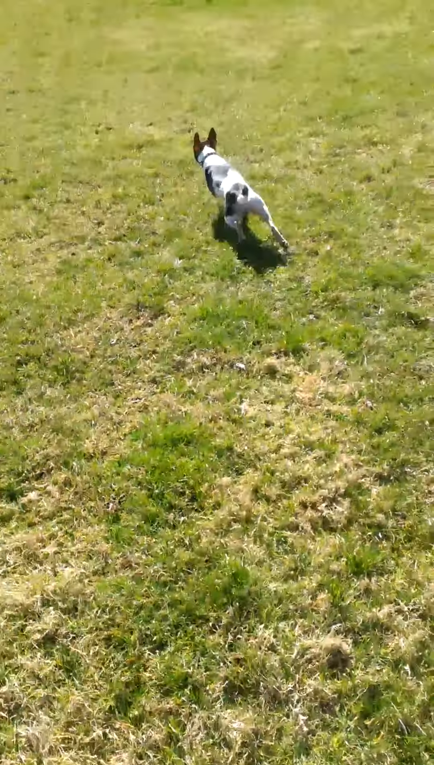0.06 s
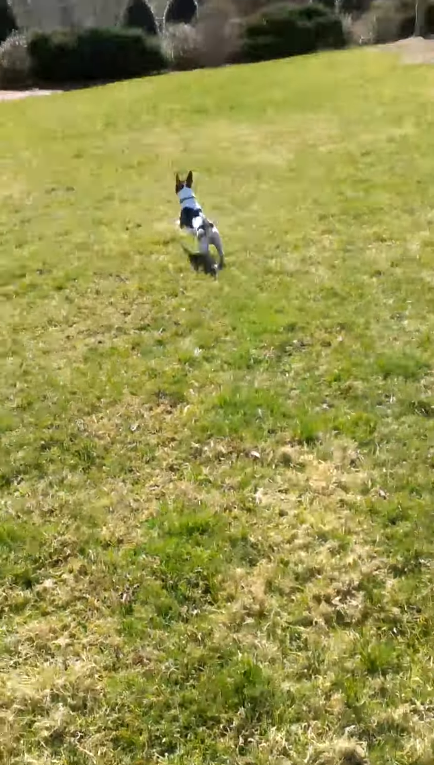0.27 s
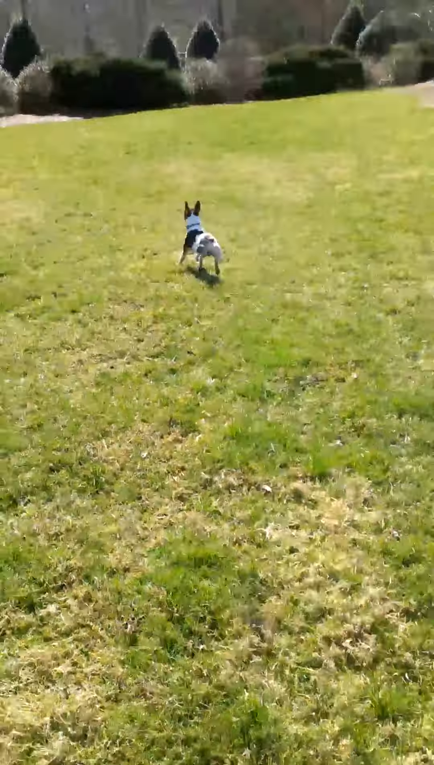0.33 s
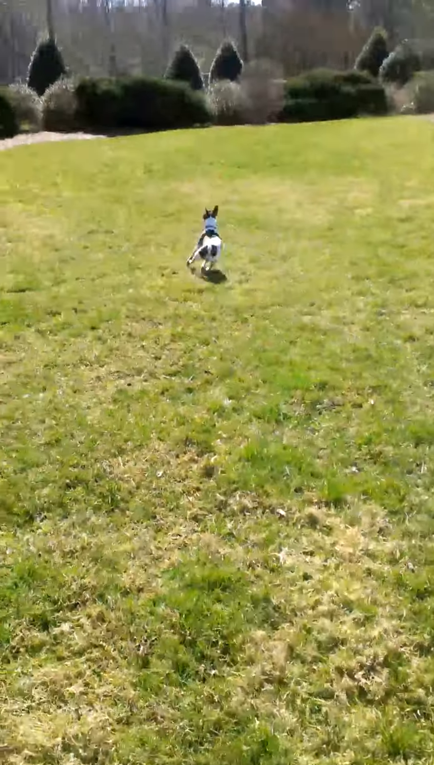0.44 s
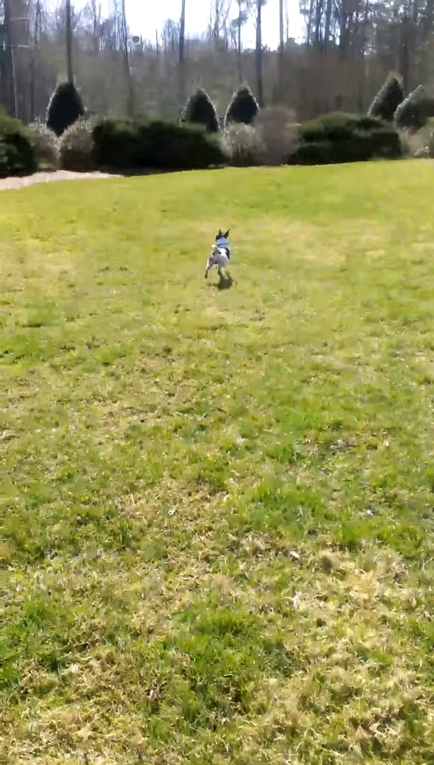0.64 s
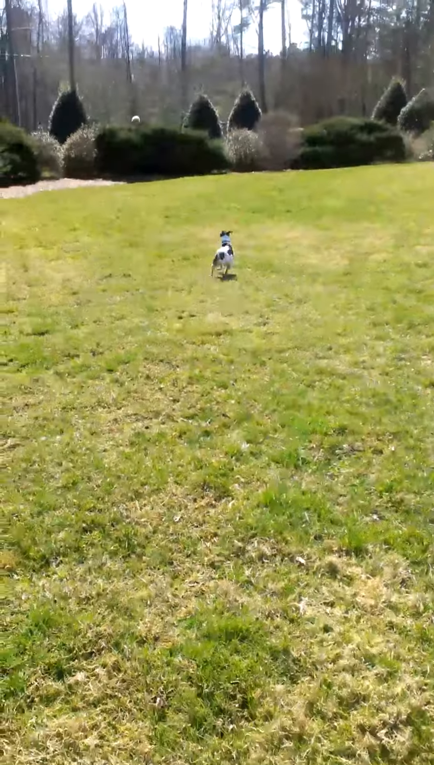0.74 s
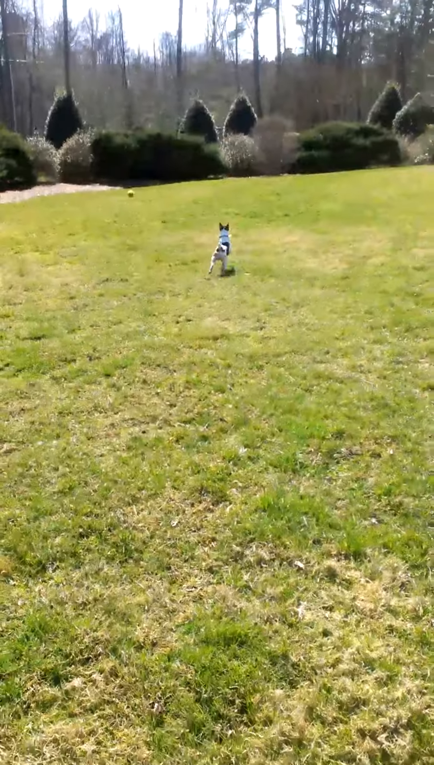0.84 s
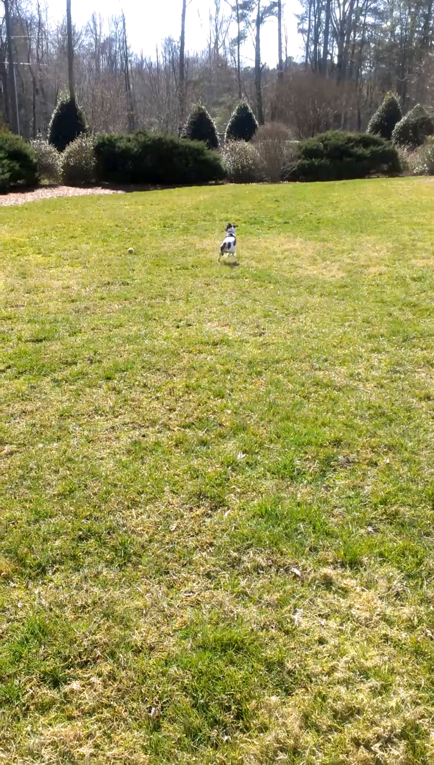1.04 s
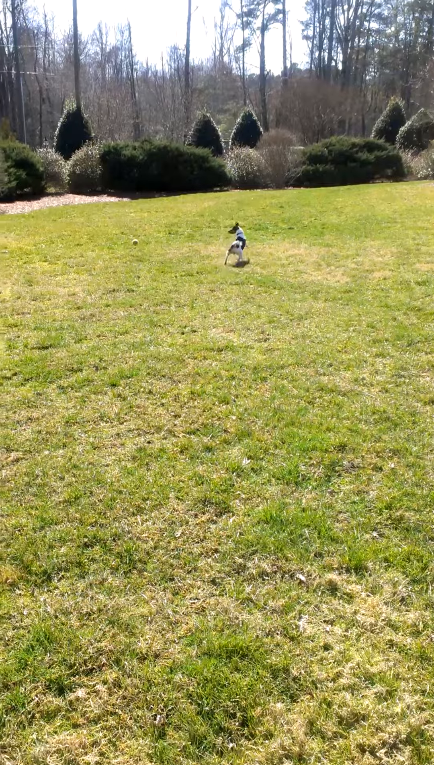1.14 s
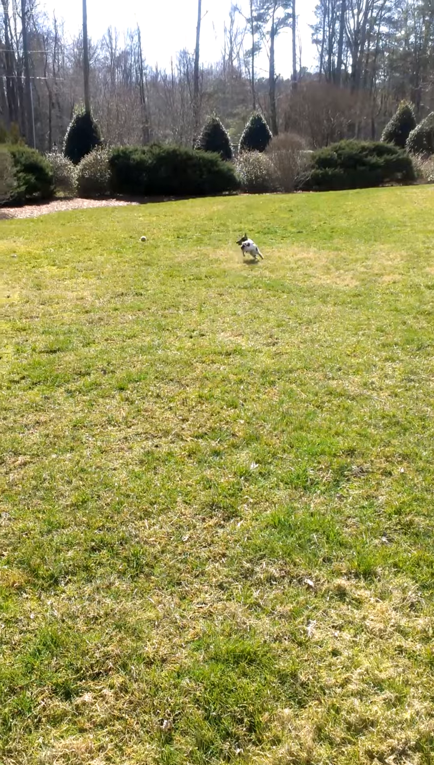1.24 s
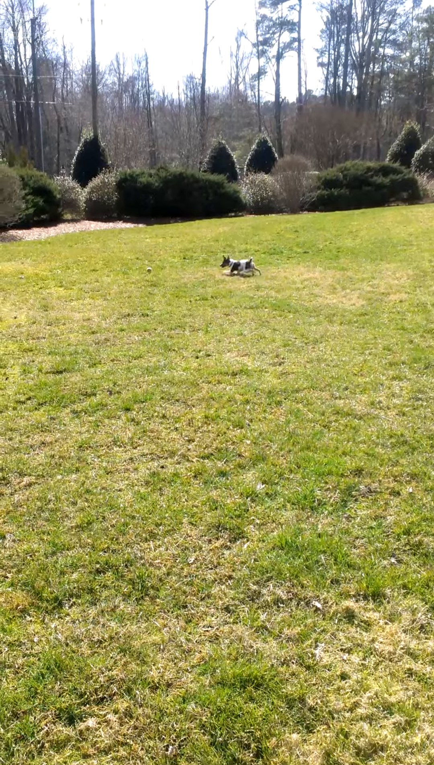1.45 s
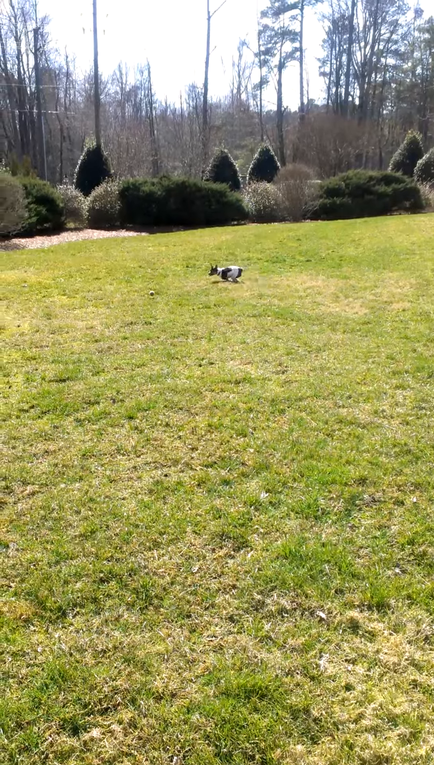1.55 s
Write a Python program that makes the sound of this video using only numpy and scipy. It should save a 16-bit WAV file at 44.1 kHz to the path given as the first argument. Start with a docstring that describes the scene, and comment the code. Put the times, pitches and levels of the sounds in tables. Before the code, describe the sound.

A galloping dog's collar tags jingle sharply, with paws swishing and crunching dry grass close by at first; then the sounds thin to faint ticks outdoors, over soft air hiss, low wind thumps and distant chirps.

```python
"""Dry lawn, outdoors: a small dog gallops away; two metal tags, a ring and a clasp on its collar knock together.
Each knock is a noise tick plus decaying modes, damped by fur or the next knock; lighter taps rattle between.
Shaped noise makes the paws' rustle and crunches; far birds are gliding sines.
Wind thumps the microphone as low tones with overtones, over patchy hiss and a low wavering noise-band drone."""
import sys
import numpy as np
from scipy import signal
from scipy.fft import rfft, irfft
from scipy.io import wavfile
from scipy.ndimage import uniform_filter1d

SR = 44100
rng = np.random.default_rng(int(sys.argv[2]) if len(sys.argv) > 2 else 0)


def store_pcm(level_fs):
    """Save levels as 16-bit WAV."""
    pcm = np.round(np.clip(level_fs, -1, 1) * 32767).astype(np.int16)
    wavfile.write(sys.argv[1], SR, np.atleast_2d(pcm).T)


def boost(x):
    """Linear amplitude factor 10**(x/20) for a level x in decibels (scalar or array-like)."""
    u = np.asarray(x, float) / 20
    return 10 ** u


N = 70560

# air spectrum: (frequency [Hz], relative density [dB per Hz])
AIR_SPECTRUM = [(12, -9), (30, -21), (50, -31), (80, -28), (120, -15), (184, -0.5), (465, -9), (913, -12),
                (1100, -17), (1800, -18.5), (2440, -21), (5670, -21.5), (8640, -19), (13500, -20.5),
                (15600, -17.5), (16500, -48)]
# air, likeness of the two sides: (frequency [Hz], correlation [-1..1])
AIR_LIKENESS = [(60, 0.15), (150, 0.78), (380, 0.94), (950, 0.27), (2380, 0.063), (5980, 0.34),
                (15000, 0.055)]
# air, stereo balance: (frequency [Hz], left minus right [dB])
AIR_TILT = [(60, -10.5), (240, -1), (950, -1), (3770, 0.5), (15000, -1)]
# bird chirps: (time [s], length [s], level [dB], start [Hz], end [Hz])
CHIRPS = [(0.712, 0.032, -68.5, 1850, 1830), (1.02, 0.013, -67, 3080, 3100),
          (1.027, 0.054, -63, 4230, 4060), (1.061, 0.023, -62, 3260, 3140),
          (1.079, 0.024, -55.5, 3100, 3030), (1.149, 0.019, -65.5, 3780, 3720),
          (1.368, 0.065, -72, 2320, 1955), (1.472, 0.052, -72, 2190, 1860)]
# wind thumps: (time [s], level [dB], length [s], mean pitch [Hz])
THUMPS = [(0.053, -58, 0.036, 261.4), (.13, -51, 0.031, 151.3), (0.2405, -38, 0.012, 184),
          (0.253, -43, 0.029, 139.8), (0.422, -62.5, 0.032, 695), (0.518, -60.5, 0.041, 385.4),
          (0.692, -56, 0.025, 211), (1.088, -49.5, 0.0037, 730), (1.089, -52, 0.0055, 1000),
          (1.345, -55, 0.033, 118.3), (1.356, -51.5, 0.0095, 458), (1.402, -39.5, .005, 278),
          (1.411, -54, 0.016, 204), (1.568, -61, 0.046, 220)]
# noise in a thump: (frequency [Hz], relative level [dB])
THUMP_BODY = [(100, 13), (250, -17), (450, -2.5), (850, -11), (1800, -6), (4000, -46)]
# microphone's response to wind: (frequency [Hz], gain [dB])
WIND_RESPONSE = [(20, -30), (70, -24), (130, 0), (800, 0), (1400, -14), (16000, -14)]
# paws in the grass: (time [s], relative level [dB])
RUSTLE = [(0, -42), (.012, -54.5), (.04, -52), (0.061, -35.5), (.098, -56), (0.127, -45), (0.15, -63),
          (.19, -51), (0.219, -46), (.232, -54.5), (.262, -45), (0.275, -38.5), (.294, -52.5), (.32, -60.5),
          (.338, -57.5), (.382, -60.5), (.422, -59), (.45, -51.5), (.462, -57.5), (.508, -55.5),
          (.524, -66), (0.544, -50), (.578, -62.5), (0.599, -53), (.615, -63.5), (.668, -67.5), (.726, -65),
          (.77, -58), (.79, -65), (0.823, -52), (.846, -66.5), (.882, -56), (.904, -67.5), (0.925, -58),
          (.94, -69), (1.01, -82), (1.027, -59.5), (1.04, -62), (1.078, -64.5), (1.093, -43),
          (1.107, -71.5), (1.158, -53), (1.172, -66), (1.22, -59.5), (1.26, -77), (1.362, -61.5),
          (1.5, -69), (1.52, -57.5), (1.559, -65), (1.564, -66), (1.574, -61), (1.6, -67)]
# grass spectrum: (frequency [Hz], relative density [dB per Hz])
GRASS_SPECTRUM = [(880, -88), (1500, -33), (3250, -18.5), (3850, -14), (4010, -13), (5150, -5.5), (7930, 1),
                  (15200, -19), (16000, -38), (16500, -77)]
# crunches of dry stalks: (time [s], onset level [dB], t60 [s], centre [Hz])
CRUNCHES = [(0.059, -45, 0.013, 7360), (0.13, -45, 0.0085, 7750), (0.247, -44, 0.016, 7800),
            (0.276, -38, 0.059, 14500), (0.257, -40.5, 0.024, 5250), (.338, -49.5, 0.024, 7100),
            (0.359, -62, 0.012, 7440), (.768, -54, 0.021, 7500), (0.883, -43.5, 0.0067, 9100),
            (0.5323, -44.5, 0.049, 13900), (.792, -50, .01, 8000), (1.09, -56, 0.097, 4700),
            (1.119, -48, 0.0066, 12900), (1.468, -47, 0.0055, 11000), (1.5642, -45, 0.013, 7900)]
# modes of each metal piece: (frequency [Hz], relative level [dB], free t60 [s])
BIG_TAG_MODES = [(3650, -38, .05), (8050, -9, .012), (10085, 0, .6), (11060, -26, .015), (13140, -20, .07),
                 (14100, -19, .03), (15450, -22, .06)]
SMALL_TAG_MODES = [(8100, -14, .02), (8730, -16, .04), (9520, 0, .08), (9800, -7, .05), (10360, -6, .08),
                   (10800, -10, .02), (14480, -18, .03), (15700, -17, .04)]
RING_MODES = [(6070, -1, .035), (6215, -2, .22), (7080, -8, .04), (7800, -12, .03)]
CLASP_MODES = [(6840, 0, .3), (13140, -8, .09), (15420, -12, .12)]
# knocks on each piece: (time [s], level [dB], ring before fur damps it [s], left minus right [dB])
BIG_TAG_KNOCKS = [(.116, -59, .02, 16), (.2464, -51, 0.012, -8), (.2722, -37, .004, 19),
                  (.277, -25.5, 0.0014, 3), (.3985, -29, 0.011, 9.5), (.4079, -36, 0.00046, -2),
                  (.5336, -31, .002, -5), (.5358, -36.5, 0.004, 7.5), (.6792, -23.5, 0.039, 6.5),
                  (.7058, -19, 0.00044, 2), (.7437, -50, .001, 1), (.791, -50.5, 0.0016, 1),
                  (.8712, -52, 0.011, -6), (1.0924, -54.5, 0.004, 13), (1.1558, -60, 0.005, 5),
                  (1.322, -52, 0.017, 8), (1.3588, -62.5, 0.078, 6), (1.5115, -49, 0.02, 4.5)]
SMALL_TAG_KNOCKS = [(.181, -42.5, 0.0092, 2), (.191, -43, 0.0019, 9), (.2453, -48.5, 0.0061, 5),
                    (.2746, -34, 0.013, -7), (.3027, -51, 0.0058, 16), (.3985, -34, .009, 6),
                    (.4079, -27.5, 0.0008, -6), (.4785, -51, .003, 6), (.4812, -39.5, 0.0025, 1),
                    (.4875, -55, .002, -19), (.5325, -42, 0.0017, -3), (.5372, -50, .002, 2),
                    (.7055, -30, 0.0034, -12), (.7194, -71, 0.0027, 1), (.857, -58, .002, -6),
                    (.8709, -49, 0.011, 3), (1.0232, -44.5, 0.009, 2), (1.036, -55, 0.0054, 10),
                    (1.3214, -54, 0.017, -3), (1.3584, -69, 0.018, 14), (1.5105, -49, 0.018, -5),
                    (1.5628, -65, 0.014, -8)]
RING_KNOCKS = [(.1116, -39.5, .001, -3), (.2763, -32.5, 0.0037, -1), (.3995, -46, 0.0078, -1),
               (.4085, -45.5, 0.0034, 0), (.5327, -55.5, .002, 2), (.597, -57, .001, 2),
               (.6784, -47.5, 0.0019, -3), (.7063, -38.5, 0.0051, 1.5), (.8714, -49, 0.002, -2),
               (1.0236, -56, 0.0044, 0.41), (1.3214, -58, 0.043, 0), (1.4456, -51, .001, 1),
               (1.5105, -51, 0.016, -2), (1.532, -60.5, 0.013, -3), (1.5638, -59, 0.0022, 0)]
CLASP_KNOCKS = [(.1145, -45, .002, 0), (.285, -67, 0.036, 0), (.409, -47.5, 0.0093, 0.41),
                (.68, -72, 0.023, 0), (.7063, -49, 0.039, 0.88), (.7445, -52.5, 0.03, 0),
                (1.3214, -60, 0.079, 0)]
# tick at contact: (frequency [Hz], relative level [dB])
TICK_SPECTRUM = [(3000, -60), (5300, -40), (6000, -4), (8000, 0), (10800, -3), (11800, -28), (14000, -16),
                 (16000, -24)]
# microphone's treble limit: (frequency [Hz], gain [dB])
TREBLE_LIMIT = [(20, 0), (15850, 0), (16250, -25)]

AIR_DB, PATCH_DB = -60.5, 2.66
DRONE_HZ, DRONE_WIDTH_HZ, DRONE_DB = 153, 26, -66
OVERTONE_STEP_DB, THUMP_BODY_DB = -9, -7
RUSTLE_GAIN_DB, SNAPS_PER_S, SNAP_SPREAD_DB = -2.5, 2000, 2.5
SWISH_RATIO, GRASS_WIDTH_RATIO = 0.67, 0.22
RATTLE_PER_S, RATTLE_DB, RATTLE_MAX_T60_S = 130, -7, 0.072
TICK_DB, TICK_T60_S = -10, .011
DETUNE_RATIO = .0012
SPOT_DB, LEAN_DB = 4, 6  # spread from knock to knock: mode level, mode left-right lean
CHATTER_DB, FIRM_DB, CHATTER_S = 3, -25, .004  # knocks lighter than FIRM_DB ring unevenly
DAMPED_T60_S, SWING_RATIO, TURN_S = .022, .85, .027
LAG_S, WIDE_HZ = .00004, 12000  # above WIDE_HZ a mode reaches one side first
SCATTER_DB, SCATTER_T60_S = -22, .05


def evened(x):
    """Scales to unit rms."""
    return x / np.sqrt(np.mean(x ** 2) + 1e-20)


def read(points, hz):
    """Interpolates a table over log frequency."""
    f, value = np.transpose(points)
    return np.interp(np.log(hz + 1), np.log(f + 1), value)


def colour(x, points):
    """Filters by a (frequency [Hz], gain [dB]) table."""
    gain = boost(read(points, np.fft.rfftfreq(x.shape[-1], 1 / SR)))
    return irfft(rfft(x) * gain, x.shape[-1])


def add(mix, s, sound, pan_db=0):
    """Adds sound at s seconds, pan_db louder on the left than the right."""
    part = mix[:, round(s * SR):][:, :sound.shape[-1]]
    part += sound[..., :part.shape[1]] * boost(np.array([[pan_db], [-pan_db]]) / 2)


def hiss():
    """Outdoor noise, its level patchy over time and frequency, partly shared by the sides."""
    frames, hz = N // 256 + 5, np.fft.rfftfreq(1024, 1 / SR)
    a, b, c, d, patches = rng.standard_normal((frames, 513, 5)).T
    patches = uniform_filter1d(patches, size=10, axis=0)
    patches = evened(uniform_filter1d(patches, size=10, axis=1))
    same = np.clip(read(AIR_LIKENESS, hz), -1, 1)[:, None]
    left = a + 1j * b
    right = same * left + np.sqrt(1 - same ** 2) * (c + 1j * d)
    tilt_db = np.array([.5, -.5])[:, None, None] * read(AIR_TILT, hz)[:, None]
    level_db = read(AIR_SPECTRUM, hz)[:, None] + PATCH_DB * patches + tilt_db
    z = np.array([left, right]) * boost(level_db)
    return boost(AIR_DB) * evened(signal.istft(z, nperseg=1024, noverlap=768)[1][:, :N])


def drone():
    """A narrow resonance on noise: a low wavering hum, 1.4 dB stronger on the right."""
    offset = (np.fft.rfftfreq(N, 1 / SR) - DRONE_HZ) / DRONE_WIDTH_HZ
    hum = evened(irfft(rfft(rng.standard_normal(N)) / (1 + offset ** 2), N))
    return boost(DRONE_DB + np.array([[-.7], [.7]])) * hum


def birds():
    """Soft, mostly falling whistles whose pitch levels off, roughened by distance."""
    out = np.zeros((2, N))
    for s, length_s, db, from_hz, to_hz in CHIRPS:
        u = np.arange(0, length_s, 1 / SR) / length_s
        flutter, waver = uniform_filter1d(rng.standard_normal((2, 4000)), size=200, axis=1)[:, :len(u)]
        pitch_hz = to_hz + (from_hz - to_hz) * (1 - u) ** 1.5 + 900 * waver
        phase = 2 * np.pi * np.cumsum(pitch_hz) / SR
        swell = np.sin(np.pi * u) ** .6
        add(out, s, boost(db + 35 * flutter) * swell * np.sin(phase), -2)
    return out


def thumps():
    """Wind pushes the microphone: uneven low tones, overtones and noise, a little stronger on the right."""
    out, t = np.zeros((2, N)), np.arange(4000) / SR
    for s, db, length_s, hz in THUMPS:
        wobble = 1 + .08 * evened(uniform_filter1d(rng.standard_normal(len(t)), size=150))
        phase = 2 * np.pi * np.cumsum(hz * wobble) / SR
        tone = sum(boost(OVERTONE_STEP_DB * k) * np.cos((k + 1) * phase - 1) for k in range(5))
        body = boost(THUMP_BODY_DB) * evened(colour(rng.standard_normal(len(t)), THUMP_BODY))
        # slow decay for length_s, then a fast one
        decay_db = -4 * t / length_s - 40 * np.maximum(t - length_s, 0) / length_s
        shape = np.minimum(t / .0015, 1) * boost(decay_db)
        add(out, s, boost(db) * shape * (tone + body), -1.5)
    return colour(out, WIND_RESPONSE)


def paws():
    """Envelope of how hard the paws stir the grass."""
    s, db = np.transpose(RUSTLE)
    return boost(np.interp(np.arange(N) / SR, s, db) + RUSTLE_GAIN_DB)


def grass():
    """Blades snap in tiny noise bursts over a steady swish, both following the paws."""
    size = boost(SNAP_SPREAD_DB * np.minimum(rng.exponential(1, N), 4))
    snaps = size * (rng.random(N) < SNAPS_PER_S / SR)
    burst = np.sqrt(signal.lfilter([1], [1, -.93], snaps ** 2))
    mid, side = rng.standard_normal((2, N)) * (evened(burst) + SWISH_RATIO)
    sides = np.array([mid + GRASS_WIDTH_RATIO * side, mid - GRASS_WIDTH_RATIO * side])
    return paws() * evened(colour(sides, GRASS_SPECTRUM))


def crunches():
    """Dry stalks crunch: decaying noise bursts, each peaked at its centre frequency."""
    out, t = np.zeros((2, N)), np.arange(2000) / SR
    for s, db, t60_s, hz in CRUNCHES:
        band = [(hz / 2, -30), (hz / 1.16, -4), (hz, 0), (hz * 1.07, -4), (hz * 2, -20)]
        noise = evened(colour(rng.standard_normal(len(t)), band))
        add(out, s, boost(db - 60 * t / t60_s) * noise)
    return out


def rattle():
    """The pieces brush each other: random light taps ring their modes, as strong as the paws are busy."""
    out, t = np.zeros((2, N)), np.arange(2000) / SR
    for modes in (BIG_TAG_MODES, SMALL_TAG_MODES, RING_MODES, CLASP_MODES):
        ring = np.zeros(len(t))
        for hz, db, t60_s in modes:
            ring += boost(db - 60 * t / min(t60_s, RATTLE_MAX_T60_S)) * np.sin(2 * np.pi * hz * t)
        taps = rng.standard_normal(N) * (rng.random(N) < RATTLE_PER_S / SR)
        side = rng.uniform(-0.13, 0.27, N)
        hits = paws() * taps * np.array([1 + side, 1 - side])
        out += signal.oaconvolve(hits, ring[None], axes=1)[:, :N]
    return boost(RATTLE_DB) * out


def jingle(knocks, modes):
    """Each knock is a tick plus modes that fade as the piece turns and die in the fur or at the next knock."""
    out, t = np.zeros((2, N)), np.arange(6000) / SR
    hz, db, t60_s = np.transpose(modes)[:, :, None]
    minor = db < -1
    side = np.array([.5, -.5])[:, None, None]
    gaps_s = np.diff(np.transpose(knocks)[0], append=N / SR)
    for (s, knock_db, free_s, pan_db), gap_s in zip(knocks, gaps_s):
        spot, drift, phase, lean, lag = rng.standard_normal((5, len(modes), 1))
        chatter = rng.standard_normal((len(modes), len(t)))
        chatter = evened(uniform_filter1d(chatter, size=round(CHATTER_S * SR), axis=1))
        chatter = np.minimum(uniform_filter1d(chatter, size=40, axis=1), 1)
        lightness = np.clip((FIRM_DB - knock_db) / 20, 0, 1)

        turn = 1 - SWING_RATIO * np.minimum(t / max(free_s, TURN_S), 1) ** 3
        # rises at contact, closes just before the next knock
        edges = np.clip(np.minimum(t / .0009, (gap_s - t) / .0015), 0, 1)
        edges = np.sin(np.pi / 2 * edges) ** 2
        fur = boost(-60 * np.maximum(t - free_s, 0) / DAMPED_T60_S)

        # the strongest modes keep their level and balance
        varied_db = (SPOT_DB * spot + LEAN_DB * lean * side) * minor
        level = boost(db + varied_db + CHATTER_DB * lightness * chatter - 60 * t / t60_s)
        heard_s = t + LAG_S * lag * side * (hz > WIDE_HZ)
        ring = level * np.sin(2 * np.pi * hz * (1 + DETUNE_RATIO * drift) * heard_s + phase)
        tick = evened(colour(rng.standard_normal(len(t)), TICK_SPECTRUM))
        tick = tick * boost(TICK_DB - 60 * t / TICK_T60_S) * edges
        add(out, s, boost(knock_db) * (turn * edges * fur * ring.sum(1) + tick), pan_db)
    return out


def scatter(x):
    """A short diffuse tail: convolution with decaying noise, different on each side."""
    t = np.arange(4000) / SR
    tail = rng.standard_normal((2, len(t))) * boost(-60 * t / SCATTER_T60_S)
    tail = tail / np.linalg.norm(tail[0])
    return boost(SCATTER_DB) * signal.oaconvolve(x, tail, axes=1)[:, :N]


def scene():
    """Collar, grass, wind, birds, air and drone together."""
    collar = jingle(BIG_TAG_KNOCKS, BIG_TAG_MODES)
    collar += jingle(SMALL_TAG_KNOCKS, SMALL_TAG_MODES)
    collar += jingle(RING_KNOCKS, RING_MODES)
    collar += jingle(CLASP_KNOCKS, CLASP_MODES)
    collar += rattle()
    collar = collar + scatter(collar)
    steps = grass() + crunches()
    background = thumps() + birds() + hiss() + drone()
    return collar + steps + background


def top_cut(x):
    """Nothing passes above the cut-off."""
    return signal.sosfilt(signal.butter(12, 16630, fs=SR, output="sos"), x)


def record(dry):
    """The phone microphone's treble limit, then the finished output."""
    mix = colour(dry, TREBLE_LIMIT)
    return top_cut(mix)


dry = scene()
out = record(dry)
store_pcm(out)
```